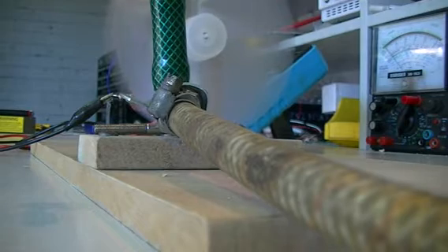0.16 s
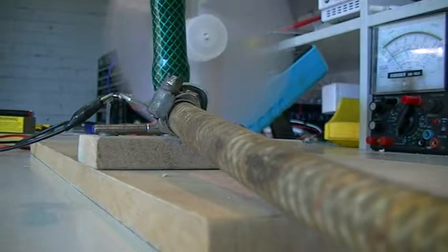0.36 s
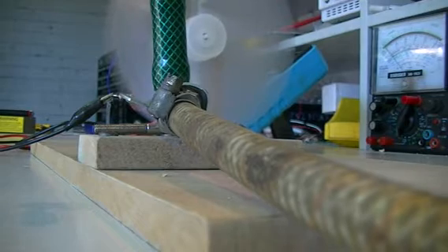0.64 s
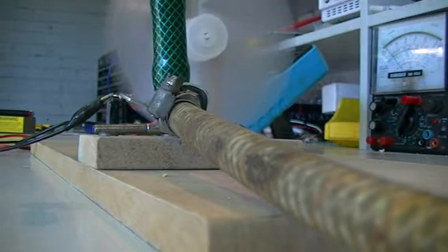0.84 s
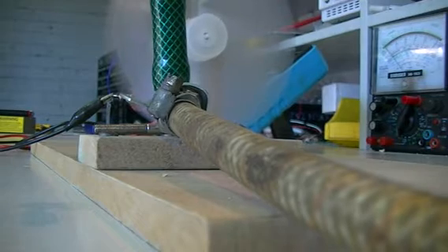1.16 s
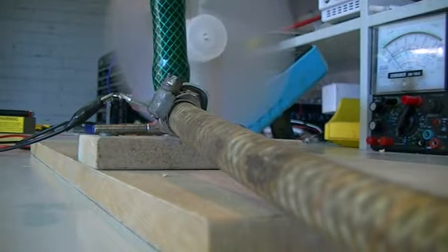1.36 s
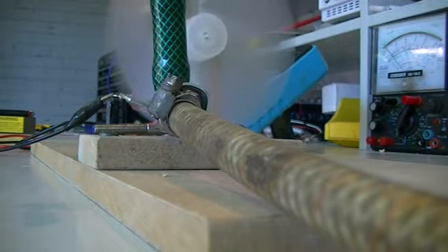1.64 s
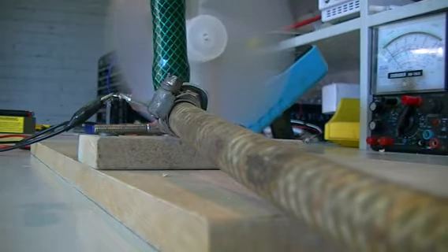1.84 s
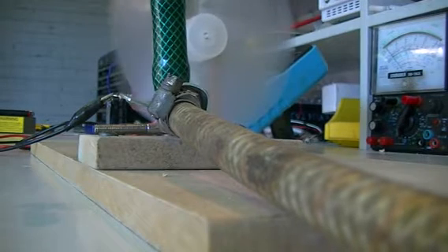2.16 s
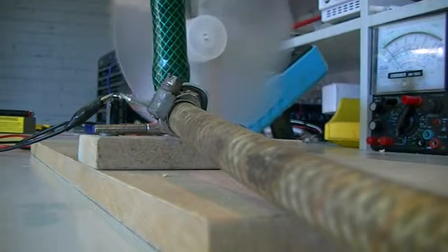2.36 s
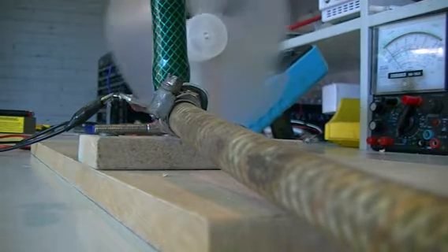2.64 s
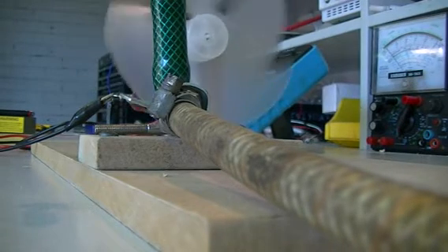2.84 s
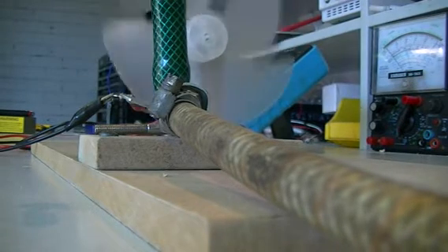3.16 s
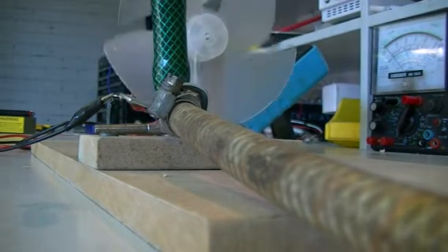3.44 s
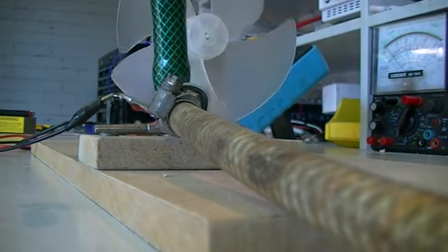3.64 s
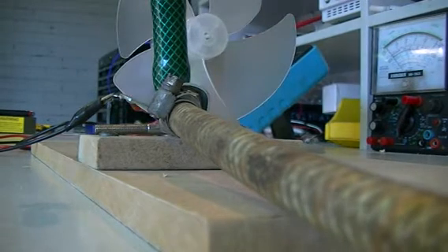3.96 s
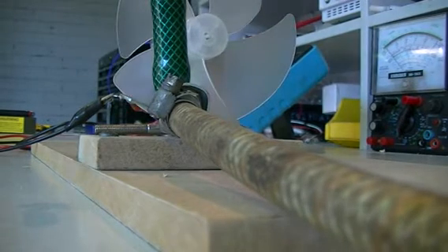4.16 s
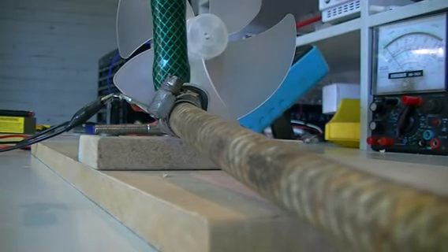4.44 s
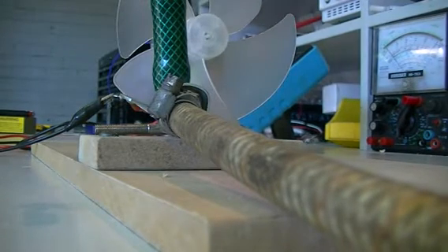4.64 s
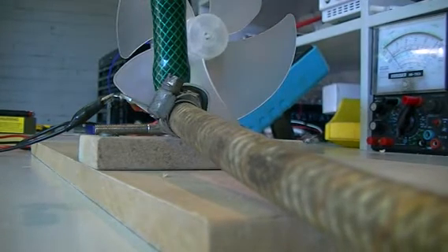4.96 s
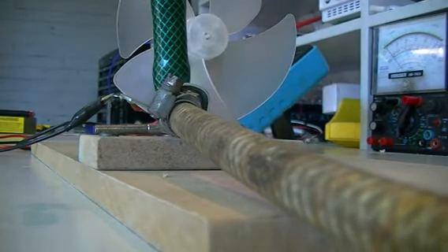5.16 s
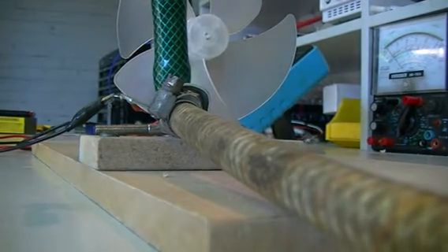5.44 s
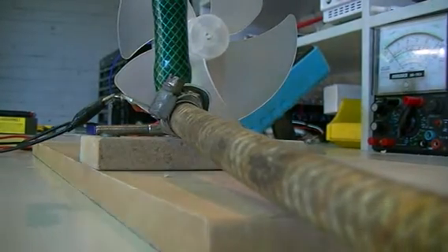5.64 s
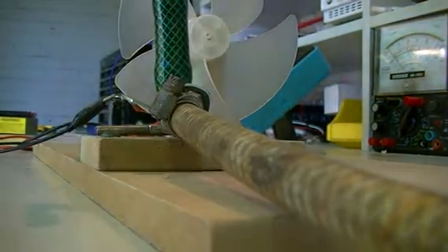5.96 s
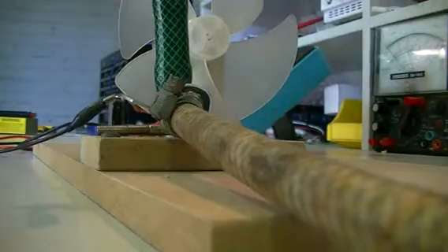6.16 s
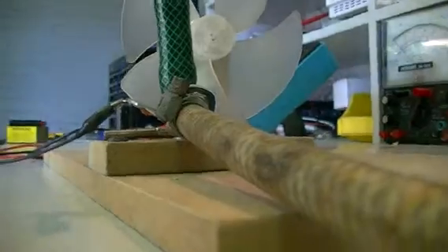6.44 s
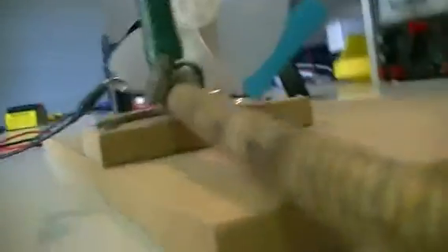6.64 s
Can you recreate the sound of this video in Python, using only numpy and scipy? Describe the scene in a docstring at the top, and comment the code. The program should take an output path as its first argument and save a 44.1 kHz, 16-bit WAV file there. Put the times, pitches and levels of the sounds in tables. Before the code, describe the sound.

Close microphone on a workbench: a forceful, steady air hiss buzzes as fan blades chop it, then drops away within a fraction of a second. After a brief quiet dip, automatic gain brings up the rough, rapid chug of a compressor, midrange and rattly, with humming tones coming and going. A few soft knocks dot it. Near the end handling gives a hard tap and the compressor turns slightly duller.

```python
"""Air jet, fan and compressor

Compressed air hisses from a nozzle onto a small fan: filtered noise, chopped by the passing blades.
When the valve shuts, the recorder's gain control lifts a piston compressor chugging in the workshop:
noise that partly repeats with every turn of the crank, with whining tones that come and go.
Short noise bursts make knocks, scuffs and faint ticks, with a few soft low thumps; near the end
the camera is picked up with a ringing tap."""
import sys
import numpy as np
from scipy import signal
from scipy.fft import rfft, irfft
from scipy.io import wavfile
from scipy.ndimage import uniform_filter1d, minimum_filter1d

SR = 44100
rng = np.random.default_rng(int(sys.argv[2]) if len(sys.argv) > 2 else 0)


def generate_wav(sig):
    """Save sig (samples, or channels by samples) to the path in sys.argv[1] as 16-bit PCM at SR."""
    pcm = np.round(np.clip(np.atleast_2d(sig).T, -1, 1) * 32767).astype(np.int16)
    wavfile.write(sys.argv[1], SR, pcm)


N = 299439  # length in samples

# crank speed in turns per second, and starting position in turns
PUMP_HZ, PUMP_START = 14.115, .474
# moment the camera is grabbed, in seconds
GRAB_S = 6.4085
# moment the air valve shuts, and the time constant of its closing, in seconds
SHUT_S, CLOSING_S = 1.732, 0.06


def undb(db):
    """Turn decibels into a gain."""
    return 10 ** (np.asarray(db) / 20)


def unit(x):
    """Scale to an rms of 1."""
    return x / np.sqrt(np.mean(x ** 2))


def walk(rate):
    """Smooth random drift with an rms of 1; rate is the number of new random points per second."""
    step = max(int(SR / rate), 2)
    points = rng.standard_normal(2000)
    drift = np.interp(np.arange(N) / step, np.arange(2000), points)
    return unit(uniform_filter1d(drift, step // 2))


def ease(start_s, lag_s):
    """Rise from 0 towards 1 after a start time, with a time constant."""
    since_start = np.maximum(np.arange(N) / SR - start_s, 0)
    return 1 - np.exp(-since_start / lag_s)


def colour(x, spectrum, resonances):
    """Filter by a smooth spectrum with resonant humps and dips on it."""
    f = np.arange(N // 2 + 1) * SR / N + 1  # the 1 avoids log(0)
    hz, db = np.transpose(spectrum)
    gain_db = np.interp(np.log(f), np.log(hz), db)
    for centre, width, lift in resonances:
        gain_db = gain_db + lift / (1 + (2 * (f - centre) / width) ** 2)
    return irfft(rfft(x) * undb(gain_db), N)


def ring(x, hz, width):
    """Pass a sound through one resonance, which answers only after it is struck."""
    b, a = signal.iirpeak(hz, hz / width, fs=SR)
    return signal.lfilter(b, a, x)


def workshop(x, wet_db, t60):
    """Add a short diffuse tail from bench, shelves and walls; it falls 60 dB in t60 seconds."""
    t = np.arange(SR // 2) / SR
    tail = rng.standard_normal(len(t)) * undb(-60 * t / t60) * (t > .002)
    tail = tail / np.linalg.norm(tail)
    echo = irfft(rfft(x) * rfft(tail, N), N)
    return x + undb(wet_db) * echo


# clatter of the compressor: (f/Hz, relative level per Hz/dB)
CLATTER_SPECTRUM = [(30, -44), (85, -28.5), (140, -14), (220, -6), (300, -8.5), (600, 1), (1000, -2.5),
                    (1500, -2), (2200, -8.5), (4300, -9.5), (7000, -15), (10000, -22), (11200, -28.5),
                    (15500, -40)]
# resonances of pump, guard and tank: (f/Hz, width/Hz, lift/dB)
TANK_RESONANCES = [(289, 16, -8), (332, 30, 7.5), (396.4, 21, 7), (419.4, 25, 4.5), (527, 19, 4),
                   (554, 19, -4.5), (600, 30, 5.5), (642, 28, 5.5), (694, 46, 6), (730, 30, 4),
                   (760, 16, 0), (837, 22, 6.5), (864, 37, 7), (954, 43, 6), (1087, 33, 4.5), (1295, 48, 6),
                   (1424, 34, 6.5), (1652, 18, 7), (1929, 117, 6), (2417, 70, 8), (2700, 110, 5.5),
                   (3010, 225, 6.5), (3457, 190, 5), (3780, 190, -1), (4140, 190, 3.5), (4527, 290, 6),
                   (5520, 390, 4), (6800, 99, 3.5)]
# fits of rattling in the guard: (t/s, lift/dB)
GUARD_RATTLES = [(2.73, 3), (2.87, 2.5), (2.98, 2.5), (3.36, 2.5), (3.51, 4), (5.5, 3.5), (5.7, 4)]
# treble of the compressor over time: (t/s, lift/dB)
TREBLE_DRIFT = [(2.55, 2), (2.95, 3), (3.6, 0), (4.1, 0.6), (4.6, 1.5), (6.3, 2)]
# upper middle of the compressor over time: (t/s, lift/dB)
MIDDLE_DRIFT = [(2.6, 1), (3.4, 0.3), (4.15, -1), (4.35, 1.7), (5.05, 1.6), (5.3, 0.5), (6.3, 0.5)]


def compressor(pump_db=-24.5, repeat_db=-8, stroke_db=0.78, valve_db=-0.4, buzz_db=-0.1, uneven_db=0.37,
               guard_hz=2900, guard_width_hz=1000, guard_db=0.5, rattle_s=0.028,
               middle_hz=1400, middle_width_hz=800, turn_away_s=0.12, away_db=-1, away_treble_db=-4):
    """Piston strokes pump a clatter through the tank; part of it repeats on every turn of the crank."""
    t = np.arange(N) / SR
    turn = PUMP_HZ * t + PUMP_START
    one_turn = rng.standard_normal(int(SR / PUMP_HZ) + 1)
    repeating = one_turn[(turn % 1 * SR / PUMP_HZ).astype(int)]
    clatter = rng.standard_normal(N) + undb(repeat_db) * repeating
    drive = workshop(clatter, wet_db=-11, t60=0.49)
    body = unit(colour(drive, CLATTER_SPECTRUM, TANK_RESONANCES))

    # loose sheet metal rattles in fits
    fits_db = sum(db * np.exp(-((t - s) / rattle_s) ** 2) for s, db in GUARD_RATTLES)
    guard_gain = undb(fits_db + guard_db * walk(16))
    body = body + ring(body, guard_hz, guard_width_hz) * (guard_gain - 1)

    middle_gain = undb(np.interp(t, *np.transpose(MIDDLE_DRIFT)))
    body = body + ring(body, middle_hz, middle_width_hz) * (middle_gain - 1)

    # the lifted camera turns away: a little quieter overall, with extra loss of treble
    away = ease(GRAB_S, turn_away_s)
    treble_db = np.interp(t, *np.transpose(TREBLE_DRIFT)) + away_treble_db * away
    low = signal.sosfiltfilt(signal.butter(2, 3500, fs=SR, output="sos"), body)
    body = low + (body - low) * undb(treble_db)

    # one swell a turn, with a faster valve flutter and a fine buzz locked to it
    per_turn = [(1, stroke_db), (4, valve_db), (16, buzz_db)]
    chug_db = sum(db * np.cos(2 * np.pi * k * turn) for k, db in per_turn)
    return body * undb(pump_db + away_db * away + chug_db + uneven_db * walk(24.95))


# tones of motor and pump: (start t/s, end t/s, f/Hz, rms level before wavering/dB, roughness 0-1)
WHINE_TONES = [(-0.5, 6.6, 420, -47, .3), (2.3, 2.65, 598, -42, .8), (2, 2.6, 645, -37, .5),
               (2.5, 3.3, 644, -38, .5), (1.9, 6.9, 865, -37.5, 0.36), (2.5, 3.78, 836, -37, .6),
               (4.5, 6.5, 635, -47, .8), (4, 5.6, 775, -36.5, .05), (6, 6.6, 776, -37.5, 0.3),
               (3.5, 5.33, 945, -46, .5), (5, 6.8, 1102, -44, 0.5), (4.5, 5.6, 1314, -42, 0.5),
               (5.85, 6.55, 732, -38, 0.1), (5.95, 6.54, 740, -44, 0.7), (2.5, 6.5, 2435, -48, .8),
               (4, 6.45, 2392, -45.5, .7)]


def motor_whine(fade_s=0.18, waver_db=1, wander_hz=0.603, flicker_hz=20, shake_db=1):
    """Tones swell out of the clatter and sink back; the rough ones flicker and shake with the crank."""
    t = np.arange(N) / SR
    out = np.zeros(N)
    stroke = np.cos(2 * np.pi * (PUMP_HZ * t + PUMP_START))
    for start, end, hz, db, rough in WHINE_TONES:
        swell = np.clip(.5 + np.minimum(t - start, end - t) / fade_s, 0, 1)
        phase = 2 * np.pi * np.cumsum(hz + wander_hz * walk(9)) / SR
        share = np.clip(rough, 0, 1)
        steady = np.sqrt(2) * np.sin(phase)
        shaken = walk(flicker_hz) * np.sin(phase) + walk(flicker_hz) * np.cos(phase)
        tone = np.sqrt(1 - share) * steady + np.sqrt(share) * shaken
        level_db = db + waver_db * walk(6) + shake_db * share * stroke
        out += swell * undb(level_db) * tone
    return out


# short noise bursts: knocks, scuffs and faint ticks
# (t/s, f/Hz, width/Hz, peak level before the bass cut/dB, decay/s)
BURSTS = [(3.025, 392, 200, -21.5, 0.018), (3.136, 665, 240, -13.5, 0.012), (3.766, 820, 400, -18, .005),
          (4.339, 368, 300, -19, 0.024), (4.837, 860, 500, -15, .004), (6.314, 258, 300, -23, 0.0035),
          (6.398, 2000, 3000, -15, 0.007), (6.4005, 6500, 1000, -14, 0.0022),
          (6.4081, 3000, 4500, -14, .001), (6.555, 1100, 1500, -16, .003)]
# ringing of the camera case: (f/Hz, level before decay and bass cut/dB, time to fall 60 dB/s)
CASE_MODES = [(776, -14, .025), (1030, -9, .02), (1352, 9, .0054), (1850, 7, .0043)]
# soft low thumps: (t/s, level before decay/dB)
LOW_THUMPS = [(1.655, -33), (1.885, -39), (6.4084, -42)]


def bursts_and_tap(rise_s=0.00094, thump_hz=45, thump_s=0.0053):
    """Fading noise through a resonance makes each burst; decaying sines make the case tap and thumps."""
    t = np.arange(N) / SR
    out = np.zeros(N)
    for s, hz, width, db, length in BURSTS:
        fading = np.exp(-np.clip((t - s) / length, 0, 40))
        noise = rng.standard_normal(N) * (t >= s) * fading
        burst = ring(ring(noise, hz, width), hz, width)
        out += undb(db) * burst / np.abs(burst).max()

    # one hard tap rings the camera case
    age = np.clip(t - GRAB_S, 0, 1)
    push = 1 - np.exp(-age / rise_s)
    for hz, db, t60 in CASE_MODES:
        decay = np.exp(-np.log(1000) * age / t60)
        out += push * undb(db) * np.sin(2 * np.pi * hz * age) * decay

    # soft low thumps are added without the bass cut
    thump = np.zeros(N)
    for s, db in LOW_THUMPS:
        age = np.clip(t - s, 0, 1)
        thump += undb(db) * np.sin(2 * np.pi * thump_hz * age) * np.exp(-age / thump_s)
    return thump + signal.sosfilt(signal.butter(2, 200, "high", fs=SR, output="sos"), out)


def jet_level(jet_db=5.5, swell_db_per_s=0.87, bleed_db_per_s=235):
    """Level of the jet in dB: it swells slightly, then falls as the closing valve lets the hose empty."""
    open_s = np.minimum(np.arange(N) / SR, SHUT_S)
    shut_s = np.cumsum(ease(SHUT_S, CLOSING_S)) / SR
    return jet_db + swell_db_per_s * open_s - bleed_db_per_s * shut_s


# bands a passing blade cancels: (f/Hz, width/Hz, level change before evening out/dB,
# deepest at share of the pass, fall in pitch as a share per pass)
BLADE_CANCELLATIONS = [(3760, 1500, -3, .96, .31), (5040, 1100, -12, .58, .23), (7240, 1200, -12, .41, .18),
                       (9060, 2300, -8, .75, .38), (11090, 3700, -12, .1, .41),
                       (11730, 3100, -12, .59, .21)]


def passing_blades(x, start_turn, size=160, blade_hz=50.95, overspeed_hz=1.2, settle_s=.38):
    """Each blade reflects the hiss onto itself; as it sweeps past, the cancelled bands slide down."""
    frames = dict(fs=SR, nperseg=size, noverlap=size - size // 8)
    f, t, bands = signal.stft(x, **frames)
    # blades passed so far: the fan settles from a slightly faster start
    blade = blade_hz * t + overspeed_hz * settle_s * (1 - np.exp(-t / settle_s)) + start_turn
    gain_db = 0
    for hz, width, db, deepest, fall in BLADE_CANCELLATIONS:
        along = (blade - deepest + .5) % 1 - .5
        off = 2 * (f[:, None] - hz * (1 - fall * along)) / width
        gain_db = gain_db + db * np.cos(np.pi * along) ** 2 / (1 + off ** 2) ** 2
    gain = undb(gain_db)
    # even out each band, so the chopping leaves its average gain power at 1
    gain = gain / np.sqrt(np.mean(gain ** 2, axis=1, keepdims=True))
    return signal.istft(bands * gain, **frames)[1][:N]


# turbulence of the jet: (f/Hz, relative level per Hz/dB)
JET_SPECTRUM = [(60, -66), (200, -44.5), (420, -20.5), (650, -8.5), (850, -4), (1250, -2.5), (2400, -5.5),
                (4800, -5.5), (6700, -6), (10000, -7), (10800, -13.5), (12300, -12.5), (13000, -22),
                (14600, -18.5), (15600, -30)]
# resonances of nozzle and pipe: (f/Hz, width/Hz, lift/dB)
NOZZLE_RESONANCES = [(553, 89, 3.5), (643, 45, -14), (1225, 29, 3), (3200, 140, 2.5), (3878, 165, 6.5),
                     (4080, 180, 3.5), (4800, 320, 4), (5450, 650, 10.5), (5800, 410, 4.5),
                     (6160, 110, 7.5), (6450, 250, -2), (7230, 400, 6.5), (7630, 250, 2.5), (8150, 310, -1),
                     (9470, 410, 4), (10200, 120, 2)]


def air_jet(linger_db=3, flutter_db=0.2, spit_db=1.0, spit_hz=5500, spit_width_hz=900):
    """Turbulence rings the nozzle, whose main resonance spits unevenly; the blades chop the hiss."""
    turbulence = colour(rng.standard_normal(N), JET_SPECTRUM, NOZZLE_RESONANCES)
    air = unit(workshop(turbulence, wet_db=-10.5, t60=0.09))
    spit_gain = undb(spit_db * walk(120))
    air = air + ring(air, spit_hz, spit_width_hz) * (spit_gain - 1)
    air = passing_blades(air, .52)
    rush = signal.sosfiltfilt(signal.butter(4, 3600, fs=SR, output="sos"), air)
    hiss = (air - rush) * undb(flutter_db * walk(220))
    # as the pressure falls, the low rush outlasts the hiss; both die away in the room
    rush = rush * undb(linger_db * ease(SHUT_S, CLOSING_S))
    jet = (rush + hiss) * undb(jet_level())
    return workshop(jet, wet_db=-20.5, t60=0.48)


def scene(fade_in_s=0.00068):
    """Everything reaches one microphone, copied to two equal channels."""
    mix = compressor() + motor_whine() + bursts_and_tap() + air_jet()
    return np.tile(mix * ease(0, fade_in_s), (2, 1))


def record(dry, top_db=-15, hold_s=0.23, release_db_per_s=33, top_hz=15680):
    """Gain control ducks at once, holds, then recovers at a steady rate; the highest treble is cut."""
    t = np.arange(N) / SR
    heard_db = 10 * np.log10(uniform_filter1d(dry[0] ** 2, SR // 10) + 1e-12)
    wanted_db = np.minimum(top_db - heard_db, 0)
    half = int(hold_s * SR / 2)
    held_db = minimum_filter1d(wanted_db, 2 * half + 1, origin=half, mode="nearest")
    # the gain may rise no faster than the release rate
    release_db = release_db_per_s * t
    gain_db = np.minimum.accumulate(held_db - release_db) + release_db
    treble_cut = signal.ellip(12, .1, 80, top_hz, fs=SR, output="sos")
    return signal.sosfilt(treble_cut, dry * undb(gain_db))


dry = scene()
out = record(dry)
generate_wav(out)
```